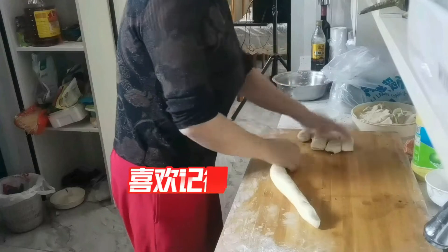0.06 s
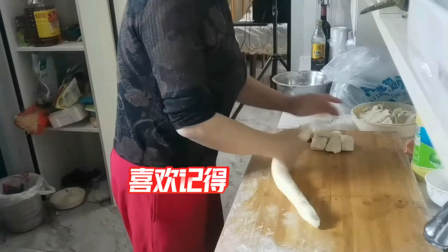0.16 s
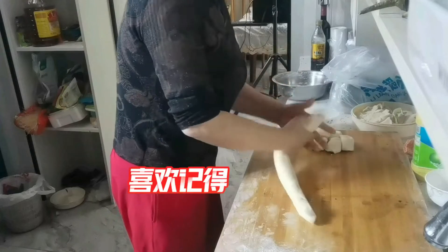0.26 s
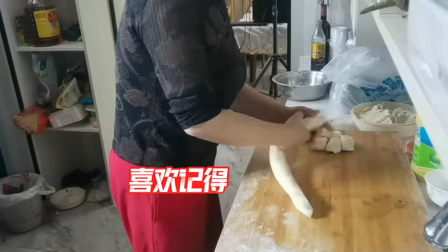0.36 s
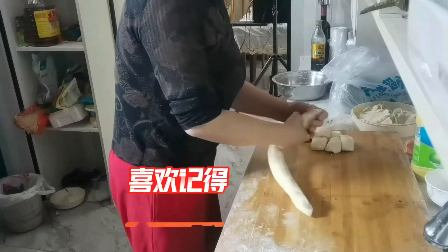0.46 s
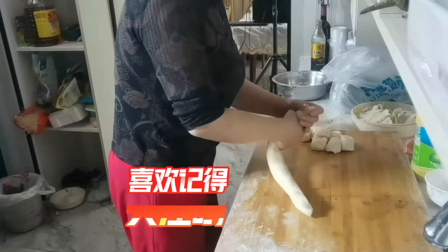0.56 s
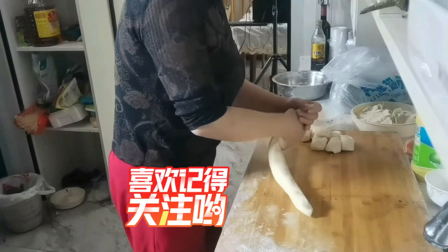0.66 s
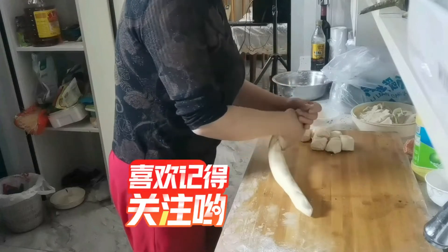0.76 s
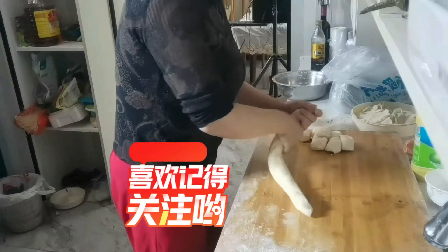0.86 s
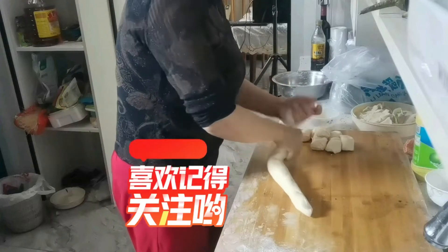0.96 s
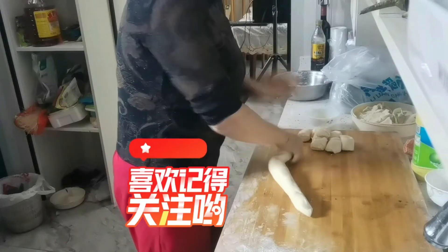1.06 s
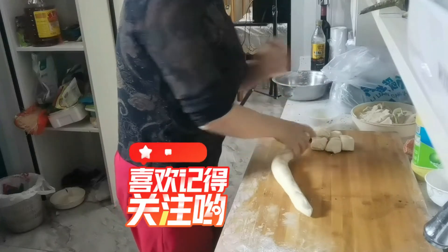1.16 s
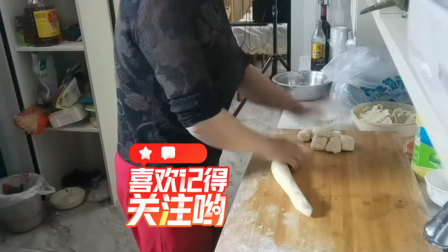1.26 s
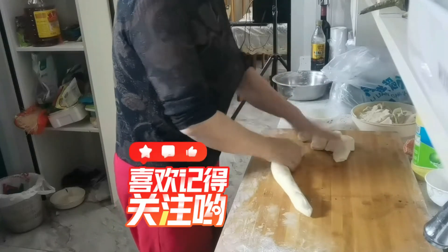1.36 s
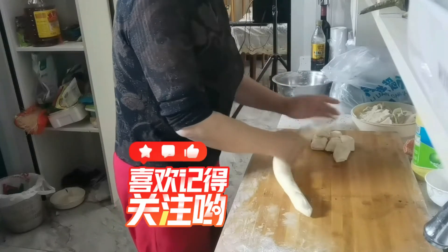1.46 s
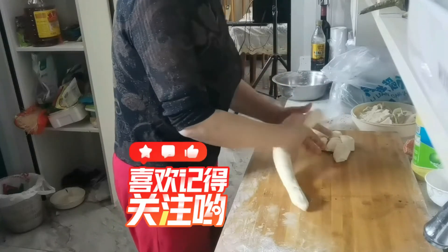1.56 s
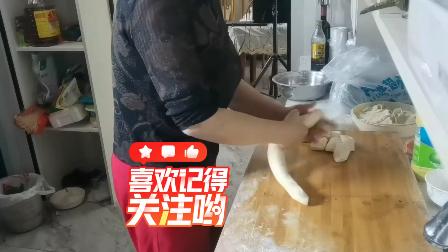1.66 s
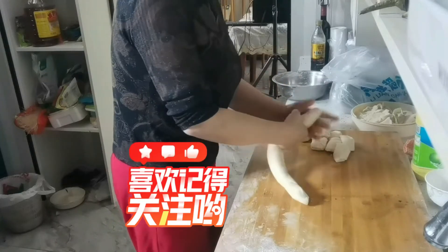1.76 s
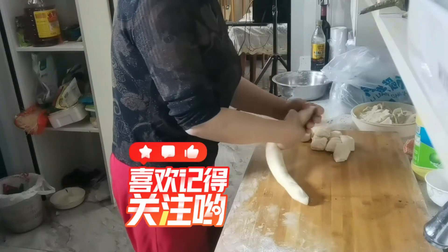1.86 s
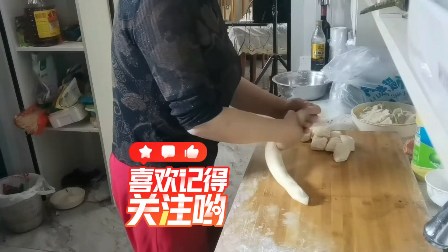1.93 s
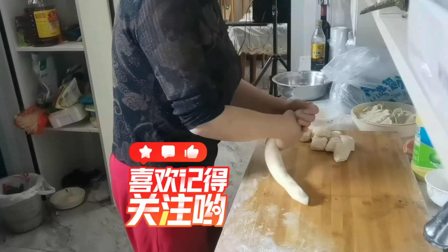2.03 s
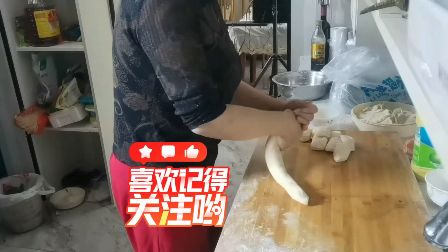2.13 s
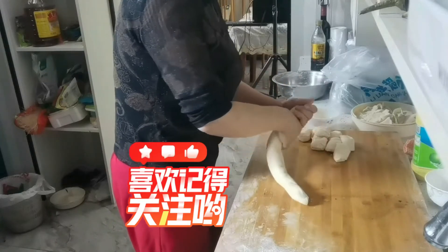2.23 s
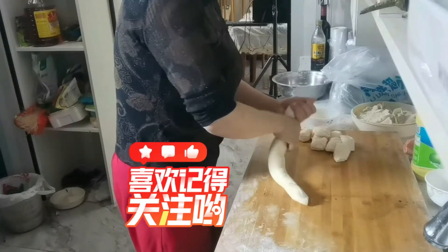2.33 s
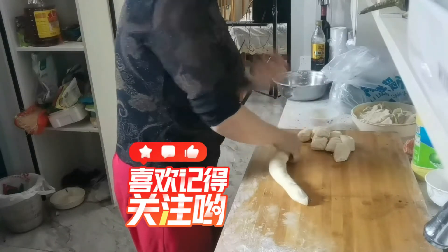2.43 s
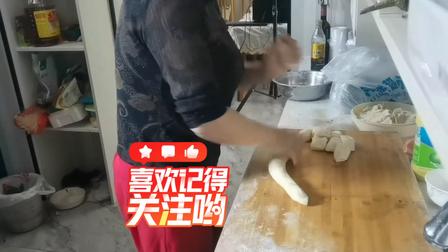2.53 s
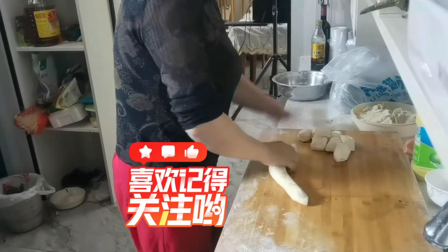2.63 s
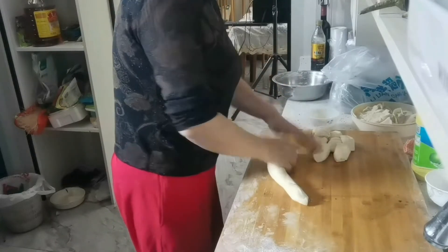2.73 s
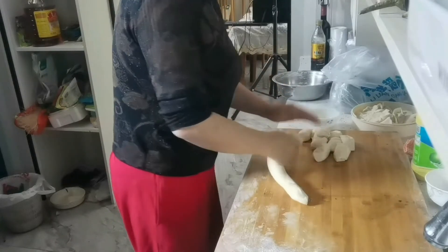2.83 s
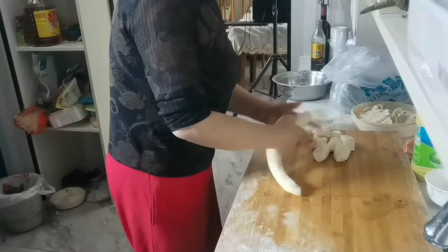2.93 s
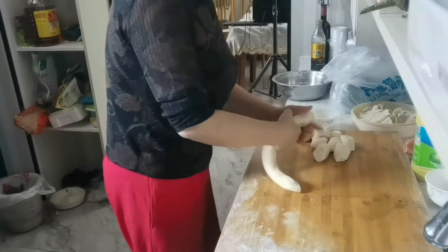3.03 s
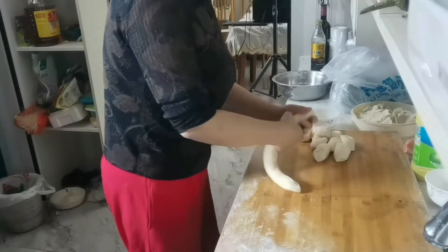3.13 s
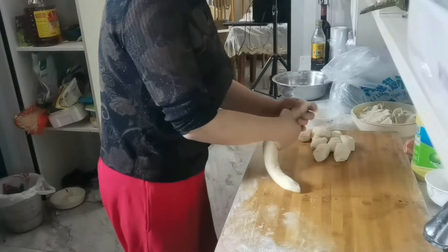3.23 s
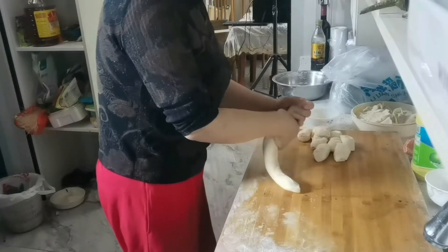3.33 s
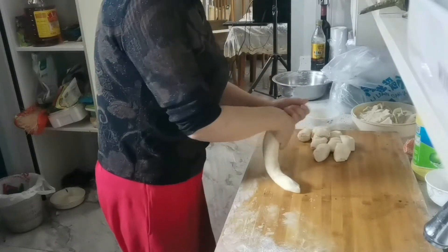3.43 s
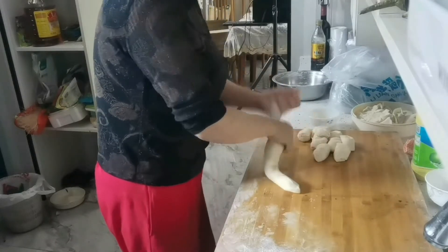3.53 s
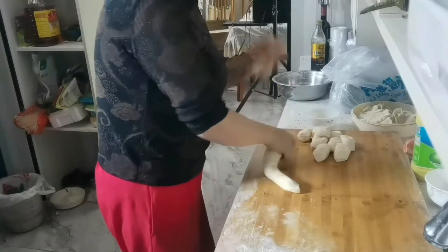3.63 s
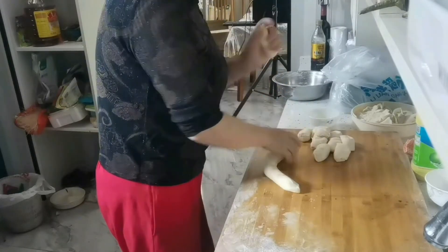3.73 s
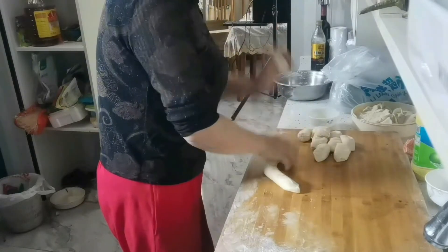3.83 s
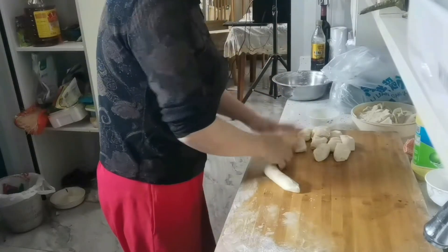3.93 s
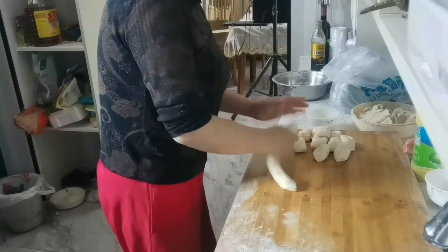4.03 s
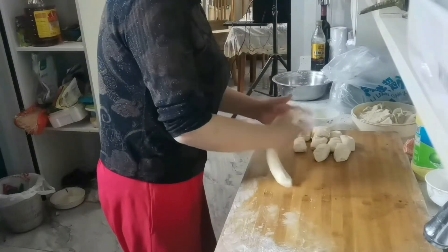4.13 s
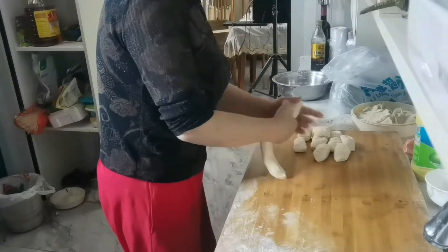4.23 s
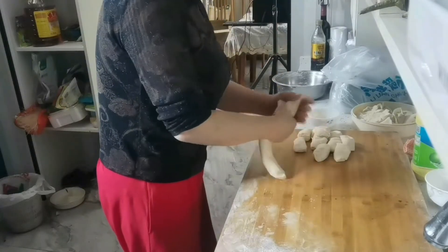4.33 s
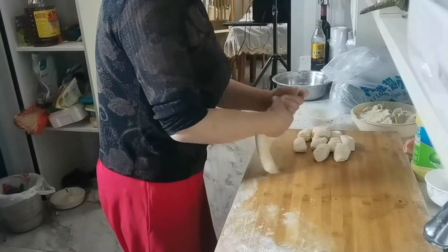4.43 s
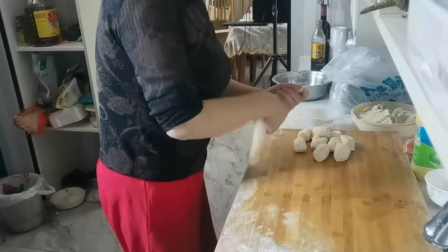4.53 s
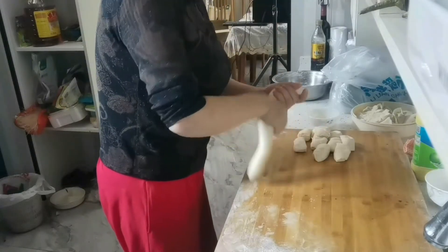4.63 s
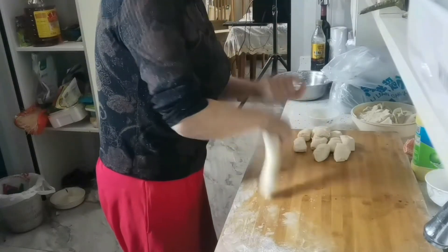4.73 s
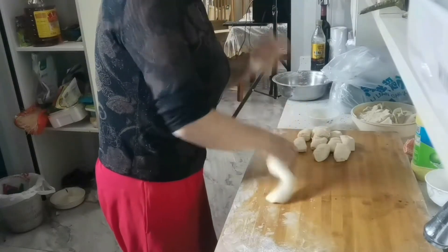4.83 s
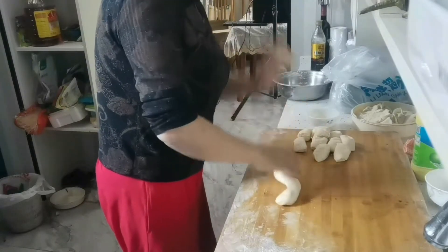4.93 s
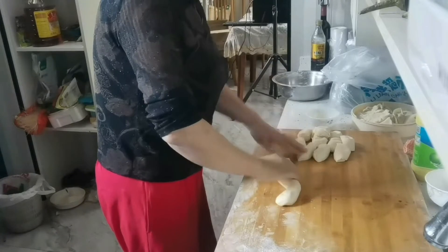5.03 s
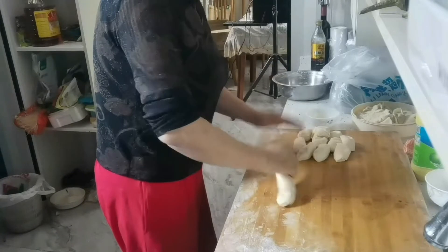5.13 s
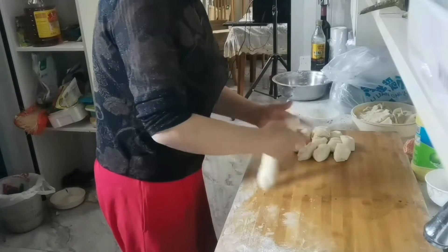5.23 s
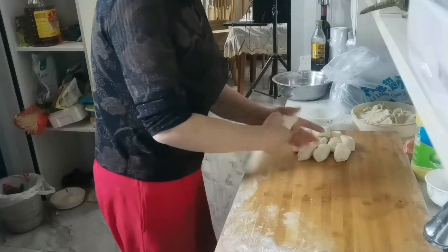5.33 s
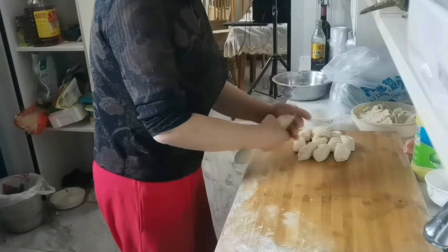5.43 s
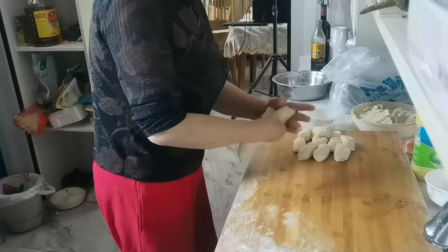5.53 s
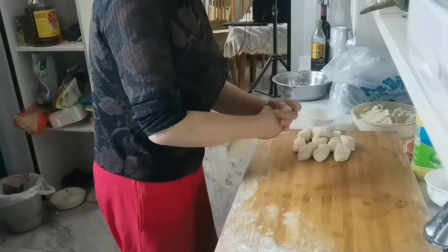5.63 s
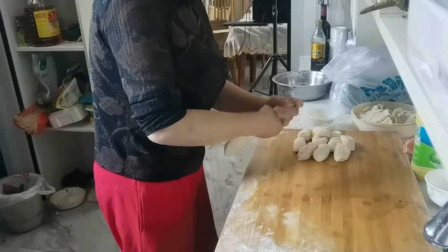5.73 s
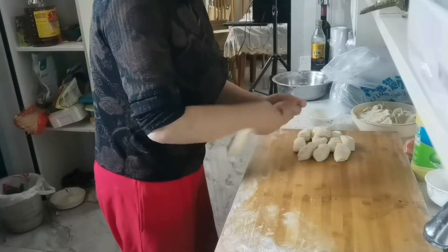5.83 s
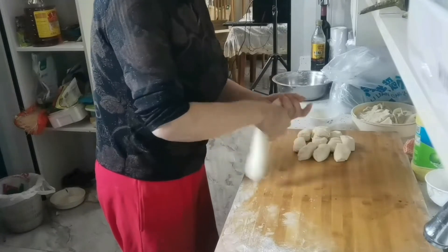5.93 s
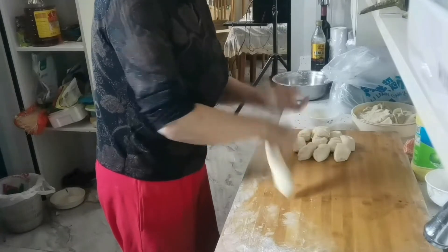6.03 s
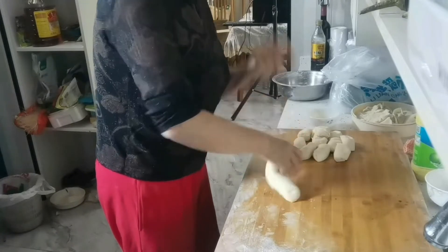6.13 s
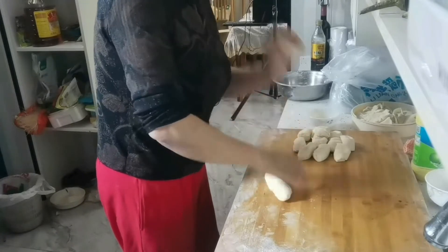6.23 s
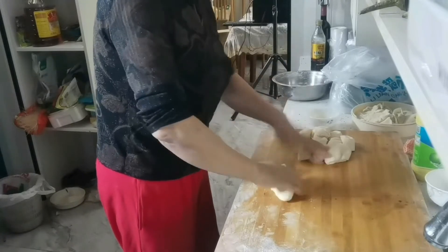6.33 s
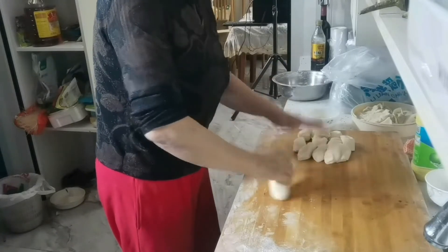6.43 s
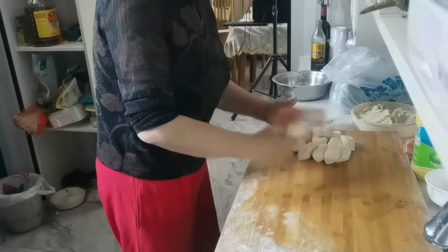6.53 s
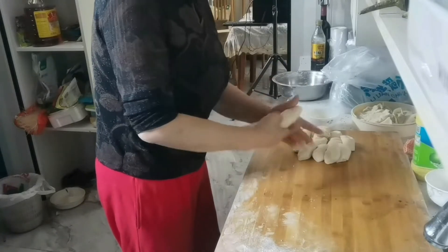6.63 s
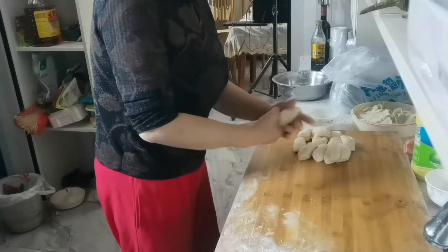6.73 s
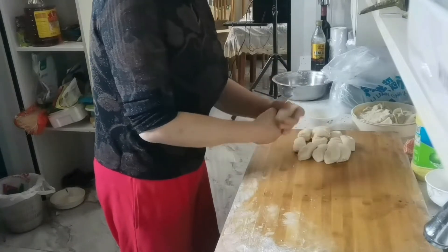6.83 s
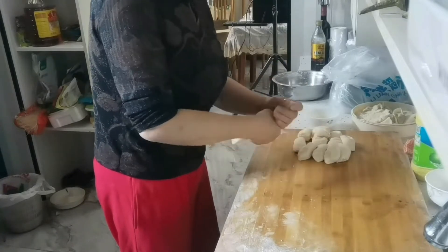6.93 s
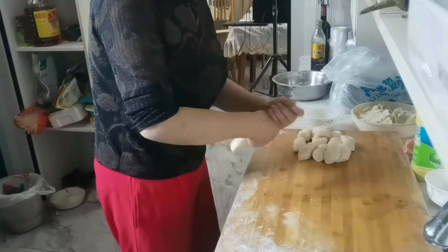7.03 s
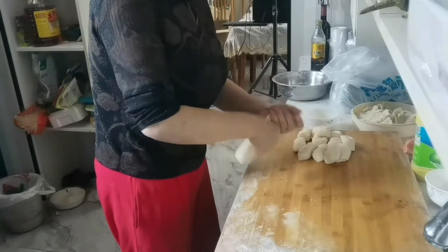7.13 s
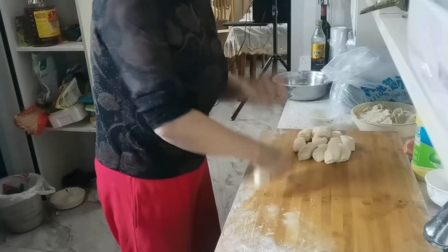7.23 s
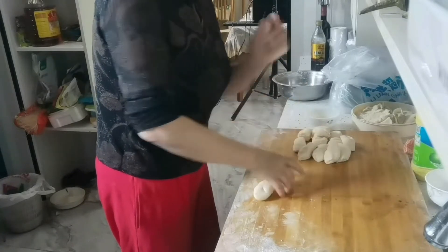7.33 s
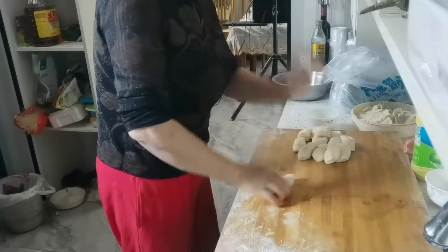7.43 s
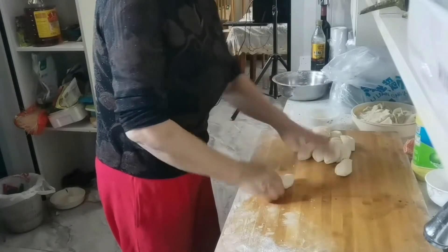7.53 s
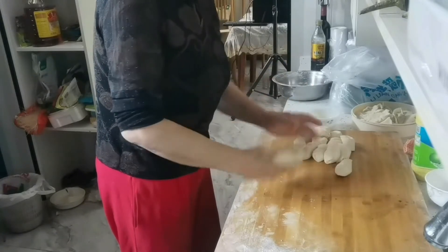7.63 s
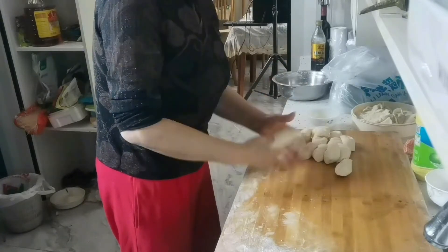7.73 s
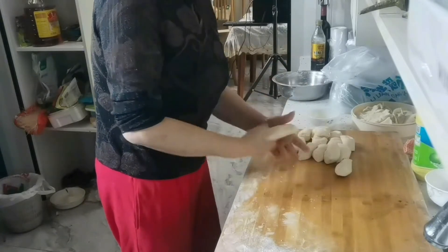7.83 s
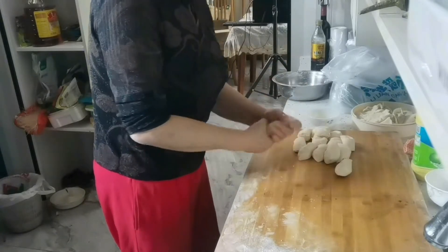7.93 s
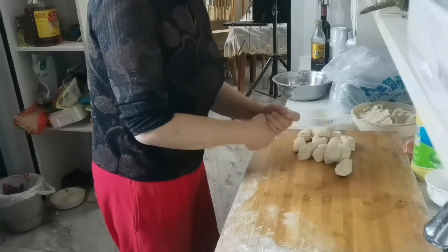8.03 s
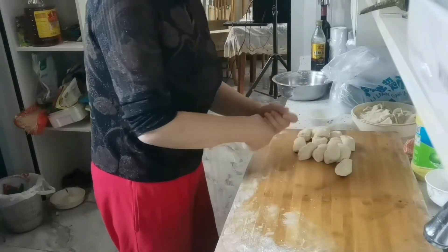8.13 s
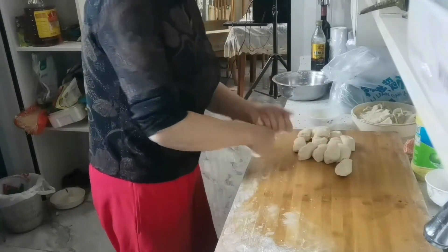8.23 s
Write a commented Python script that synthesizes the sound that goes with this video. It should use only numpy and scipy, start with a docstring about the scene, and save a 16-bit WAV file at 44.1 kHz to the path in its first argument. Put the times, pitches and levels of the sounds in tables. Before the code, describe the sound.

In a small kitchen, hands tear lumps from a dough rope and smack them onto a wooden board in steady rhythm, low thuds booming through the table.

```python
"""Dough slaps on a floured wooden board, about one every 1.25 s: coloured bursts of touches, board modes, skid.
Between them a rope of dough is gripped and wiped (grain noise), snaps with a pop in the fist, and flops back.
The table booms and rocks underneath as low swelling tones; a soft hiss swells into each slap.
A small hard-walled kitchen, noise decaying band by band, rings around it over low rumble and a faint hum."""
import sys
import numpy as np
from scipy import signal
from scipy.fft import rfft, irfft, next_fast_len
from scipy.io import wavfile

SR = 44100
rng = np.random.default_rng(int(sys.argv[2]) if len(sys.argv) > 2 else 0)


def inscribe(sig):
    """Save sig as 16-bit PCM at rate SR to the path in sys.argv[1].

    A 1-D sig is mono; a 2-D sig holds one channel per row.
    Samples are clipped to [-1, 1] before scaling.
    """
    pcm = np.round(np.clip(np.atleast_2d(sig).T, -1, 1) * 32767)
    wavfile.write(sys.argv[1], SR, pcm.astype(np.int16))


N = 365313
TIME_S = np.arange(N) / SR
SHORT_S = TIME_S[:SR]

# Event levels are those of burst(), ahead of the gains in place().
# Hand and dough hit the board: t/s, crack/dB, smack/dB, air pocket f/Hz, thud/dB, thud f/Hz, skid/dB, skid length/s
SLAPS = [(0.001, -32.5, -25, 3200, -25, 88.9, -39, 0.011), (1.2672, -35.5, -37, 900, -40, 200, -41, 0.071),
         (1.31, -27.5, -21.5, 1400, -23.5, 104.1, -44.5, 0.035),
         (2.657, -40.5, -42.5, 1204, -43, 171, -37, 0.059),
         (2.731, -25.5, -31, 2470, -21.5, 122, -34, 0.093),
         (3.878, -69.5, -41.5, 1790, -44.5, 107.5, -46.5, 0.051),
         (3.914, -23.5, -27.5, 1206, -22, 108.6, -32, 0.11),
         (5.01, -42, -38.5, 5580, -46, 123.7, -46.5, 0.031),
         (5.0404, -31.5, -19, 2600, -20, 125.4, -46.5, .04),
         (6.296, -47.5, -42, 3510, -47, 109.5, -53.5, 0.025),
         (6.342, -29.5, -25.5, 2200, -28, 87.2, -37, 0.036),
         (7.427, -43, -44.5, 3470, -50.5, 109.5, -40.5, 0.085),
         (7.474, -39, -40, 2010, -44.5, 228.5, -41.5, 0.048),
         (7.517, -24.5, -30.5, 2500, -36, 137, -26.5, 0.09),
         (7.549, -44.5, -43.5, 1490, -34.5, 203.8, -31, 0.077)]
# Fist pulls the rope apart: t/s, snap/dB, hollow pop/dB, pop delay/s, grip/dB, pull before/s, slide after/s
TEARS = [(0.982, -42, -37.5, 0.033, -59.5, 0.074, 0.11), (2.3981, -32, -39.5, 0.026, -53, 0.2, 0.087),
         (3.6044, -43, -63, 0.0067, -55, .15, 0.043), (4.761, -41, -63.5, 0.0047, -57.5, .19, .16),
         (6.0344, -46.5, -56.5, 0.022, -59, .23, 0.22), (7.1937, -41.5, -74, 0.013, -59, 0.27, 0.21)]
# Limp rope flops onto the board: t/s, pat/dB, thud/dB, thud f/Hz, swell/s
FLOPS = [(1.004, -46.5, -42.5, 97, 0.016), (1.178, -63.5, -41, 91.6, .034), (2.431, -44.5, -50, 127, 0.025),
         (2.631, -56.5, -54.5, 95, .01), (3.753, -63.5, -41.5, 87.5, 0.033),
         (3.848, -58.5, -55.5, 100, .012), (4.875, -51.5, -36, 88, 0.027), (6.061, -62, -47.5, 94.6, .032),
         (6.162, -56, -35, 76, .032), (7.294, -52, -29, 85, 0.036)]
# Palm wipes over the dough for a new grip: t/s, grip/dB, length/s
WIPES = [(0.24, -61, 0.15), (1.551, -58, 0.16), (2.891, -50.5, .1), (3.075, -74, 0.11), (4.027, -55, 0.18),
         (4.432, -82, 0.067), (5.139, -54, .12), (5.415, -77, 0.03), (6.72, -79, 0.11), (8.185, -85.5, .12)]
# Nominal modes of board and table: f/Hz, level/dB, t60/s
BOARD_MODES = [(56, -9.5, 0.26), (65, -9.5, 0.17), (77.72, -3.5, 0.16), (92.7, -4.5, 0.37),
               (103, -2, 0.073), (125.5, -2.5, 0.4), (135.8, -11, 0.46), (151.2, -6.5, 0.61),
               (157.7, -28, 2.4), (199, -5, 0.056), (232.7, 0, 0.45), (251.3, -9.5, 0.83),
               (318, 1.5, 0.089), (414, 0, 0.29), (505, 2.5, 0.2), (677, -5.5, 0.22), (780, -0.5, 0.3)]
# Spectrum of air cracking out: f/Hz, level/dB
CRACK_SPECTRUM = [(200, -18), (1000, -15.5), (2200, -9), (3600, -10), (5300, 0), (7400, -7), (9000, -0.5),
                  (12000, -7.5), (15500, 1)]
# Spectrum of the flesh smack: f/Hz, level/dB
SMACK_SPECTRUM = [(80, -15.5), (230, 3), (330, 2.5), (500, 1), (630, -2), (800, -1), (1050, -7),
                  (1600, -3.5), (2200, -8.5), (3500, -5.5), (5500, -7), (15500, -14.5)]
# Spectrum of the flour skid: f/Hz, level/dB
SKID_SPECTRUM = [(100, -7), (300, 6), (900, -0.5), (1500, 3.5), (3500, -6), (5300, 2), (7400, -9),
                 (9000, 1.5), (12000, -8), (15500, -9)]
# Spectrum of the pop in the fist: f/Hz, level/dB
POP_SPECTRUM = [(90, -10.5), (250, -6), (550, -1.5), (850, -5.5), (1200, -11), (2200, -21.5), (5000, -26.5),
                (15000, -55.5)]
# Spectrum of a rope pat: f/Hz, level/dB
PAT_SPECTRUM = [(90, -2.5), (350, 2), (800, -7), (1700, -9.5), (3500, -16), (5500, -14), (15000, -30)]
# Spectrum of firm skin rub: f/Hz, level/dB
SKIN_SPECTRUM = [(400, -28.5), (1000, -25), (2200, -15.5), (3700, -23.5), (5000, -1.5), (7500, -10.5),
                 (9000, 3), (11800, -7.5), (15000, -3.5)]
# Thin hiss of the lightest touch: f/Hz, level/dB
BRUSH_SPECTRUM = [(1000, -37), (7600, -21.5), (9100, 0), (10000, -8.5), (11200, -15), (15000, -16)]
# Spectrum of the low background: f/Hz, level/dB
LOW_SPECTRUM = [(20, -15.5), (50, -4), (100, -1), (135, -4), (200, -17), (400, -24.5), (1000, -35.5),
                (3000, -37.5), (9000, -39.5), (15500, -36.5)]
# Low background: dying tail of earlier blows at the start, then quiet rumble: t/s, level/dB
LOW_LEVEL = [(0, -57), (0.8, -71), (1.3, -67.5), (3.4, -65.5), (5.8, -68), (7.1, -69), (7.7, -72),
             (8.28, -75.5)]
# Steady motor hum: f/Hz, level/dB
HUM = [(96.9, -79), (123.8, -77)]
# Decay of the kitchen: f/Hz, t60/s
ROOM_DECAY = [(60, 0.86), (150, .6), (300, 0.36), (700, 0.27), (2000, 0.32), (5000, 0.21), (10000, 0.24),
              (16000, 0.26)]
# A light touch is duller than a full blow: crack/dB, top of treble f/Hz (lowpass() caps it at SR / 3)
EDGE = [(-33.5, 7700), (-30.5, 18000)]

TOP_HZ = 15600
LEAD_S = .03  # soft hiss swelling into each slap
SAG_S = .022  # weight of the rope after its first pat
# Grip gain over a pull, fast at first, levelling off before the snap.
TIGHTEN_DB, TIGHTEN_CURVE = 22.5, 2.8
# Grip loss while the rope slides through the fist; extra loss once it lets go.
SLACKEN_DB_PER_S, LET_GO_DB_PER_S = 21.5, 248.5
# Grip at the ends of a wipe, and the flour it drags, both against its middle.
WIPE_ENDS_DB, WIPE_FLOUR_DB = -8.5, 1.5
# Catch and slip of the skin: rms spread of the grip, rate.
CATCH_DB, CATCH_HZ = 3, 35
# Table rocking back as the weight comes off after a slap.
ROCK_DELAY_S, ROCK_SWELL_S, ROCK_DB = .27, .058, -18
ROCK_HZ, ROCK_FOLLOW = 126.9, 0.21  # own pitch, share of the way to the thud pitch


def amp(db):
    """Decibels to gain."""
    return 10 ** (np.asarray(db) / 20)


def unit(x):
    """Scale to an rms of 1."""
    return x / np.sqrt(np.mean(x ** 2))


def burst(x, db):
    """Scale a short sound to the energy of 30 ms at this rms level."""
    return x * amp(db) * np.sqrt(.03 * SR / np.sum(x ** 2))


def add(track, t_s, x):
    """Mix a short stereo sound in at t_s, cropped to the track."""
    start = int(round(t_s * SR))
    x = x[:, max(-start, 0):N - start]
    first = max(start, 0)
    track[:, first:first + x.shape[1]] += x


def lookup(points, hz):
    """Read a table on a log-frequency axis."""
    f, value = np.transpose(points)
    return np.interp(np.log(np.maximum(hz, 1)), np.log(f), value)


def lowpass(x, hz):
    """Gentle second-order roll-off."""
    return signal.sosfilt(signal.butter(2, min(hz, SR / 3), fs=SR, output="sos"), x)


def colour(x, points):
    """Causal minimum-phase filter with the given spectrum, by folding the cepstrum."""
    size = 2 * next_fast_len(len(x) // 2 + 1024, real=True)
    gain = amp(lookup(points, np.fft.rfftfreq(size, 1 / SR)))
    cepstrum = irfft(np.log(gain))
    cepstrum[1:size // 2] *= 2
    cepstrum[size // 2:] = 0
    return irfft(rfft(x, size) * np.exp(rfft(cepstrum)))[:len(x)]


def diffuse(size, spacing_m=0.17):
    """Noise from all sides at two ports: alike in the bass, unrelated in the treble."""
    likeness = .95 * np.sinc(2 * np.fft.rfftfreq(size, 1 / SR) * spacing_m / 343)

    def random_phase(power):
        return np.exp(2j * np.pi * rng.random(len(power))) * np.sqrt(power)

    mid = random_phase(1 + likeness)
    side = random_phase(1 - likeness)
    return unit(irfft(np.array([mid + side, mid - side]), size))


def kitchen(build_s=0.00015, hold_s=0.0053):
    """Dense echoes of near walls build up, hold briefly, die band by band; each call draws its own."""
    t = SHORT_S[:30000]
    noise = rfft(diffuse(len(t)))
    hz = np.fft.rfftfreq(len(t), 1 / SR)
    octave = np.log2(np.clip(hz, 62.5, 16000) / 62.5)
    tail = 0
    for k in range(9):
        band = irfft(noise * np.maximum(1 - abs(octave - k), 0), len(t))
        t60_s = lookup(ROOM_DECAY, 62.5 * 2 ** k)
        tail = tail + band * np.exp(-np.log(1000) * np.maximum(t - hold_s, 0) / t60_s)
    tail = tail * (1 - np.exp(-t / build_s))
    return tail / np.sqrt(np.sum(tail ** 2) / 2)


def place(x, room, direct_db, room_db, pan_db):
    """The straight path reaches the left port first; the room comes from everywhere."""
    late = np.concatenate([np.zeros(4), x[:-4]])
    direct = np.array([x * amp(pan_db / 2), late * amp(-pan_db / 2)])
    echoes = signal.fftconvolve(x[None], room, axes=1)[:, :len(x)]
    return amp(direct_db) * direct + amp(room_db) * echoes


def background():
    """A faint motor hum in low coloured noise: a dying tail at the start, then quiet rumble."""
    low = unit(np.array([colour(side, LOW_SPECTRUM) for side in diffuse(N)]))
    hum = sum(amp(db) * unit(np.sin(2 * np.pi * hz * TIME_S)) for hz, db in HUM)
    return amp(np.interp(TIME_S, *np.transpose(LOW_LEVEL))) * low + hum


def swelling_hiss(rise_s=.004):
    """A short noise swells exponentially and stops at LEAD_S."""
    swell = np.exp(np.minimum(SHORT_S - LEAD_S, 0) / rise_s) * (SHORT_S < LEAD_S)
    return colour(rng.standard_normal(SR) * swell, SKID_SPECTRUM)


def contact(decay_s, spectrum, grit=0.99):
    """One main touch and many tiny ones right after it, evened out so that no pitch stands out."""
    touches = rng.choice([-1, 1], SR) * np.exp(-SHORT_S / decay_s)
    touches *= grit / np.sqrt(np.sum(touches ** 2))
    touches[0] = 1
    even = irfft(np.exp(1j * np.angle(rfft(touches))), SR)  # phase only: flat spectrum
    even[SR // 2:] = 0
    return colour(even, spectrum)


def peel(length_s, spectrum):
    """A contact line races across the dough within a few milliseconds."""
    arch = np.sin(np.pi * np.minimum(SHORT_S / length_s, 1))
    return colour(rng.choice([-1, 1], SR) * arch, spectrum)


def cupped(x, hz, q=0.81):
    """The air pocket under the palm rings at hz and muffles what lies above."""
    corner = 2 * SR * np.tan(np.pi * min(hz, SR / 3) / SR)
    return signal.lfilter(*signal.bilinear([corner ** 2], [1, corner / q, corner ** 2], SR), x)


def board(hz, cycles=0.46, scatter_db=2.5, hard=0.071, body_db=-10.5, body_hz=175, body_s=.014):
    """The landing dough wobbles briefly and drives the board modes; each blow weights them anew."""
    wobble = np.exp(-SHORT_S * hz / cycles) * np.sin(2 * np.pi * hz * SHORT_S)
    push = wobble + hard * np.exp(-SHORT_S * hz)
    ring = 0
    for k, (f, db, t60_s) in enumerate(BOARD_MODES):
        mode_hz = f * (1 + 0.017 * rng.standard_normal())  # each pitch is scattered a little at random
        gain = (-1) ** k * amp(db + scatter_db * rng.standard_normal())
        fade = np.exp(-np.log(1000) * SHORT_S / t60_s)
        ring = ring + gain * fade * np.sin(2 * np.pi * mode_hz * SHORT_S)
    # The patch under the dough gives way at once, before the modes have built up.
    tones = np.sin(2 * np.pi * hz * SHORT_S) + 0.42 * np.sin(2 * np.pi * body_hz * SHORT_S)
    body = np.exp(-SHORT_S / body_s) * tones
    return unit(signal.fftconvolve(push, ring)[:SR]) - amp(body_db) * unit(body)


def skid(length_s, lumpy_db=2, slip_hz=90):
    """Flour grains grind under the sliding hand, which catches and slips."""
    slips = unit(lowpass(rng.standard_normal(SR), slip_hz))
    grains = rng.standard_normal(SR) * amp(5.0 * rng.standard_normal(SR) + lumpy_db * slips)
    stroke = np.sin(np.pi * np.minimum(SHORT_S / length_s, 1)).clip(0) ** .5
    return colour(grains * stroke, SKID_SPECTRUM)


def slaps():
    """Air cracks out from under the dough, the flesh smacks, the board thuds and the hand skids on flour."""
    out = np.zeros((2, N))
    for t_s, crack_db, smack_db, pocket_hz, thud_db, thud_hz, skid_db, skid_s in SLAPS:
        room = kitchen()
        edge_hz = np.interp(crack_db, *np.transpose(EDGE))
        hiss = burst(swelling_hiss(rise_s=0.0045), crack_db - 10.0)
        crack = contact(decay_s=0.00038, spectrum=CRACK_SPECTRUM, grit=2.1)
        crack = burst(lowpass(crack, edge_hz), crack_db)
        line = burst(peel(0.0012, CRACK_SPECTRUM), crack_db)
        smack = contact(decay_s=0.0033, spectrum=SMACK_SPECTRUM, grit=1.4)
        smack = burst(cupped(smack, pocket_hz), smack_db)
        thud = burst(board(thud_hz), thud_db)
        slide = burst(lowpass(skid(skid_s), edge_hz), skid_db)
        add(out, t_s - LEAD_S, place(hiss, room, direct_db=-7, room_db=0.0, pan_db=8.5))
        add(out, t_s, place(crack, room, direct_db=-15.0, room_db=-2.0, pan_db=4.5))
        add(out, t_s, place(line, room, direct_db=-8.0, room_db=-20, pan_db=9.5))
        add(out, t_s + .0008, place(smack, room, direct_db=-9.0, room_db=-3.0, pan_db=3.0))
        add(out, t_s, place(thud, room, direct_db=-0.3, room_db=-8.0, pan_db=2.0))
        add(out, t_s, place(slide, room, direct_db=-5.0, room_db=0.5, pan_db=3.0))
    return out


def grip():
    """Pressure of skin on dough in dB: builds up to each tear, slackens after it, arches over each wipe."""
    gestures = []
    for t_s, _, _, _, db, pull_s, slide_s in TEARS:
        ahead = np.clip((t_s - TIME_S) / pull_s, 0, 2)
        since_s = np.maximum(TIME_S - t_s, 0)
        tighten = TIGHTEN_DB * ahead ** TIGHTEN_CURVE
        let_go = LET_GO_DB_PER_S * np.maximum(since_s - slide_s, 0)
        gestures.append(db - tighten - SLACKEN_DB_PER_S * since_s - let_go)
    for t_s, db, length_s in WIPES:
        gestures.append(db + WIPE_ENDS_DB * (2 * (TIME_S - t_s) / length_s - 1) ** 2)
    return np.maximum(np.max(gestures, axis=0), -120)


def rubbing():
    """Fine flour grains hiss between skin and dough; a light touch is thin, a firm grip broad."""
    grip_db = grip() + CATCH_DB * unit(lowpass(rng.standard_normal(N), CATCH_HZ))
    grains = rng.standard_normal((2, N)) * amp(2.7 * rng.standard_normal((2, N)))
    firm = unit(colour(grains[0], SKIN_SPECTRUM)) * amp(grip_db - 5.5)
    light = unit(colour(grains[1], BRUSH_SPECTRUM)) * amp(.65 * grip_db - 34)
    out = place(firm + light, kitchen(), direct_db=-6.5, room_db=4.5, pan_db=11)
    for t_s, db, length_s in WIPES:
        flour = burst(skid(length_s), db + WIPE_FLOUR_DB)
        add(out, t_s, place(flour, kitchen(), direct_db=-11, room_db=-1, pan_db=5))
    return out


def boom(hz, swell_s, rough=0.17, shudder_db=6.0):
    """The table swings under a soft load: a low tone that swells, shudders and fades."""
    waver, shudder = (unit(lowpass(noise, 17)) for noise in rng.standard_normal((2, SR)))
    swell = (SHORT_S / swell_s) ** 2 * np.exp(-2 * SHORT_S / swell_s)
    tone = np.sin(2 * np.pi * hz * SHORT_S + rough * waver)
    return swell * amp(shudder_db * shudder) * tone


def rocking(heavy_db=-22, growth=2.1):
    """After each slap the table swings back; a heavy blow rocks it far more than a light one."""
    out = np.zeros((2, N))
    for t_s, _, _, _, thud_db, thud_hz, _, _ in SLAPS:
        hz = ROCK_HZ + ROCK_FOLLOW * (thud_hz - ROCK_HZ)
        db = heavy_db + growth * (thud_db - heavy_db) + ROCK_DB
        swing = burst(boom(hz, ROCK_SWELL_S, rough=1.0, shudder_db=4.5), db)
        add(out, t_s + ROCK_DELAY_S, place(swing, kitchen(), direct_db=-3.0, room_db=-3.5, pan_db=2))
    return out


def tears():
    """The stretched dough snaps, and the gap pops in the hollow of the fist."""
    out = np.zeros((2, N))
    for t_s, snap_db, pop_db, delay_s, *_ in TEARS:
        room = kitchen()
        line = burst(peel(0.0033, CRACK_SPECTRUM), snap_db)
        fibres = burst(contact(decay_s=0.0073, spectrum=CRACK_SPECTRUM, grit=4.5), snap_db)
        pop = burst(contact(decay_s=0.014, spectrum=POP_SPECTRUM, grit=1.0), pop_db)
        add(out, t_s, place(line, room, direct_db=-8.5, room_db=-11.5, pan_db=3))
        add(out, t_s, place(fibres, room, direct_db=-13.5, room_db=-1.5, pan_db=10))
        add(out, t_s + delay_s, place(pop, room, direct_db=-21.5, room_db=-2.0, pan_db=10))
    return out


def flops():
    """The tip of the rope pats down, then the rest settles along its length and loads the table."""
    out = np.zeros((2, N))
    for t_s, pat_db, thud_db, hz, swell_s in FLOPS:
        room = kitchen()
        tip = burst(contact(decay_s=0.0092, spectrum=PAT_SPECTRUM), pat_db)
        rest = burst(contact(decay_s=.035, spectrum=PAT_SPECTRUM, grit=4.2), pat_db - 4)
        load = burst(boom(hz, swell_s), thud_db)
        add(out, t_s, place(tip, room, direct_db=-8.5, room_db=1.03, pan_db=2.5))
        add(out, t_s + SAG_S, place(rest, room, direct_db=-9, room_db=-1.0, pan_db=2.5))
        add(out, t_s + SAG_S, place(load, room, direct_db=-1.3, room_db=-8, pan_db=2.5))
    return out


def scene():
    """The work at the board over the quiet of the kitchen."""
    return background() + slaps() + rubbing() + rocking() + tears() + flops()


def record(dry):
    """The left port is a little brighter; the sharpest peaks are rounded and the top is cut steeply."""
    treble = signal.sosfilt(signal.butter(1, 7000, "high", fs=SR, output="sos"), dry[0])
    left = dry[0] + 0.53 * treble
    rounded = .75 * np.tanh(np.array([left, dry[1]]) / .75)
    return signal.sosfilt(signal.ellip(10, .2, 80, TOP_HZ, fs=SR, output="sos"), rounded)


dry = scene()
out = record(dry)
inscribe(out)
```